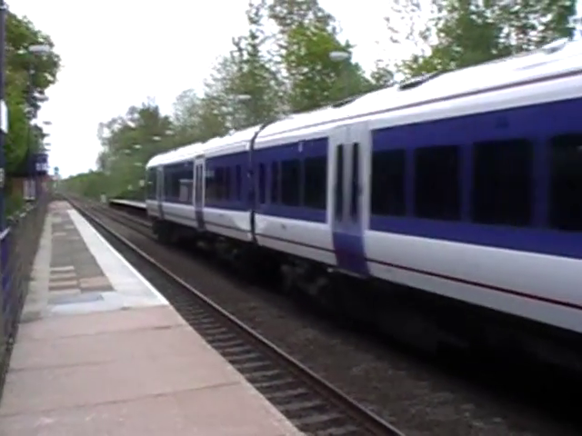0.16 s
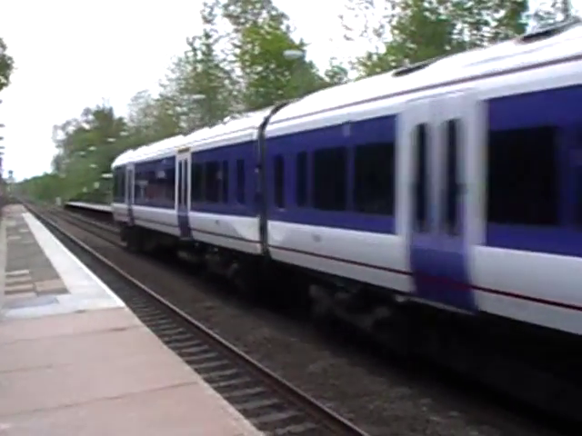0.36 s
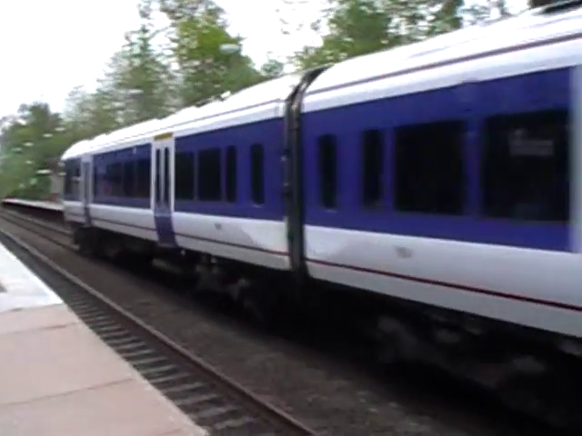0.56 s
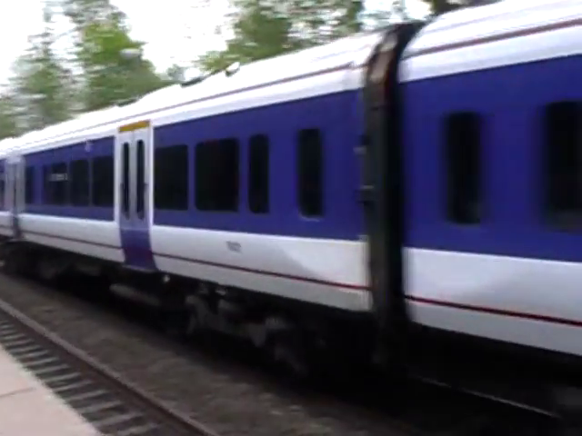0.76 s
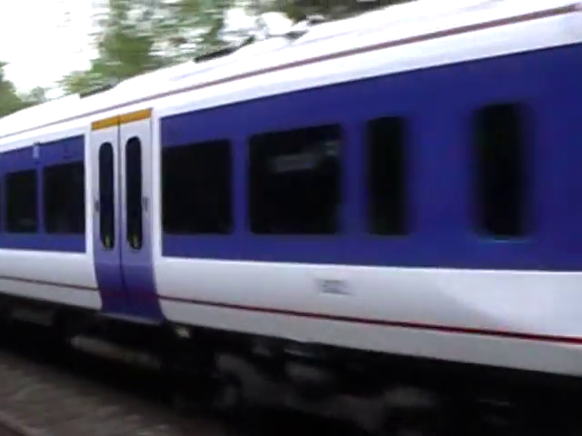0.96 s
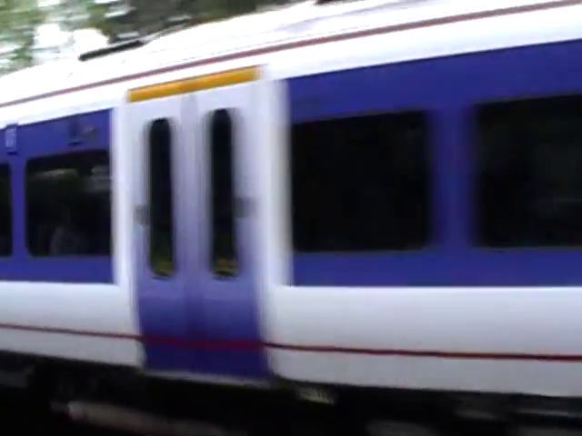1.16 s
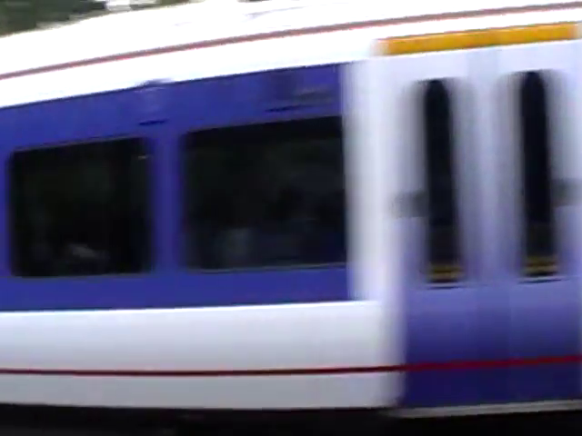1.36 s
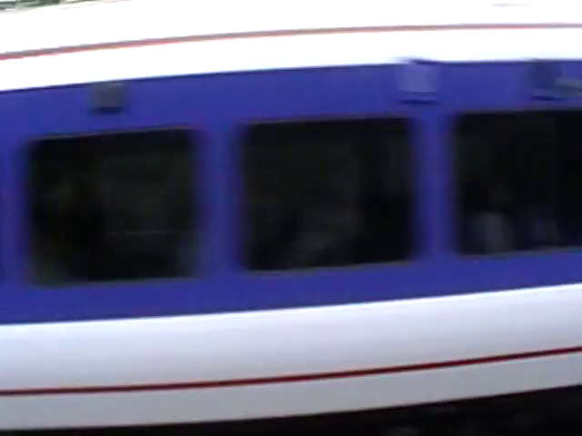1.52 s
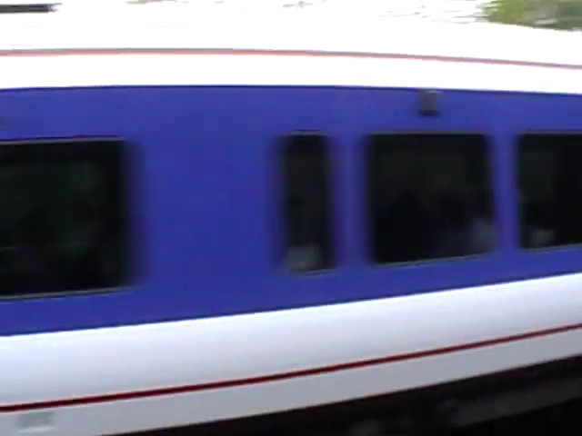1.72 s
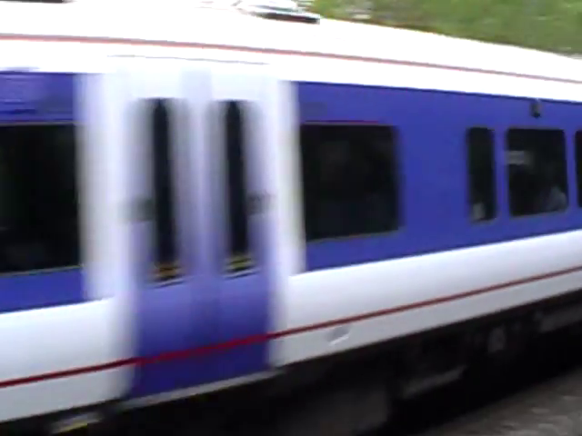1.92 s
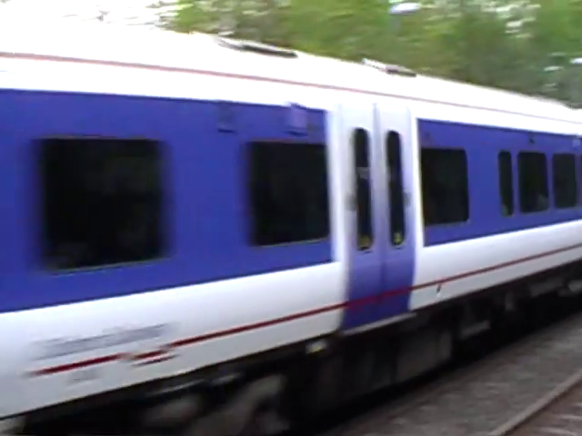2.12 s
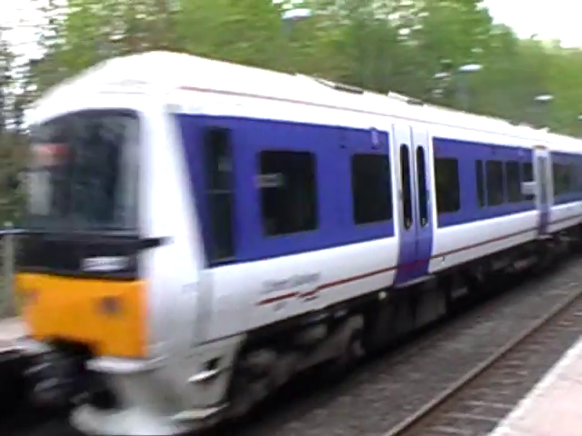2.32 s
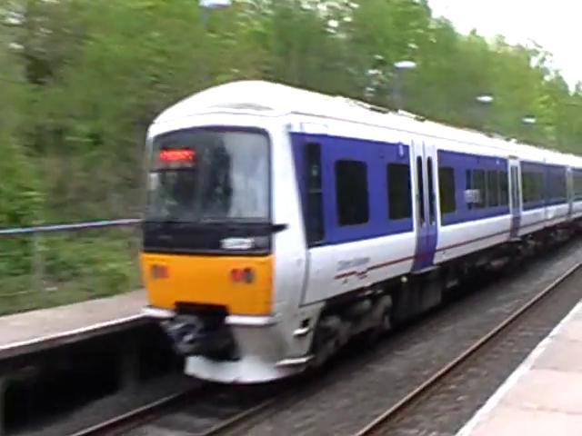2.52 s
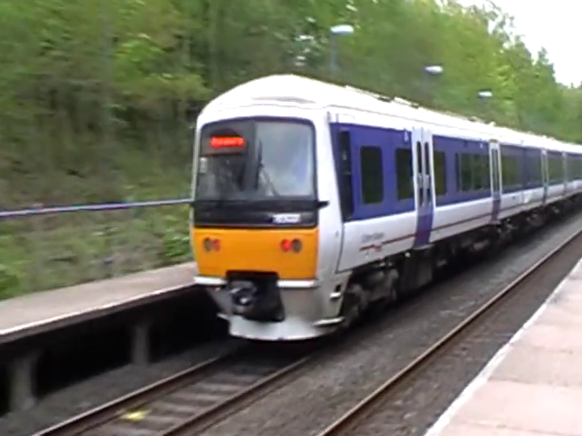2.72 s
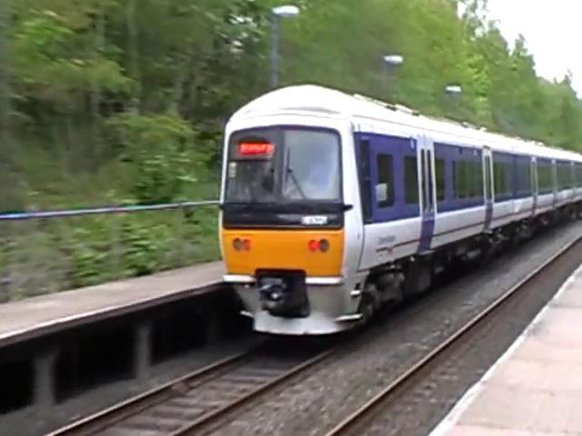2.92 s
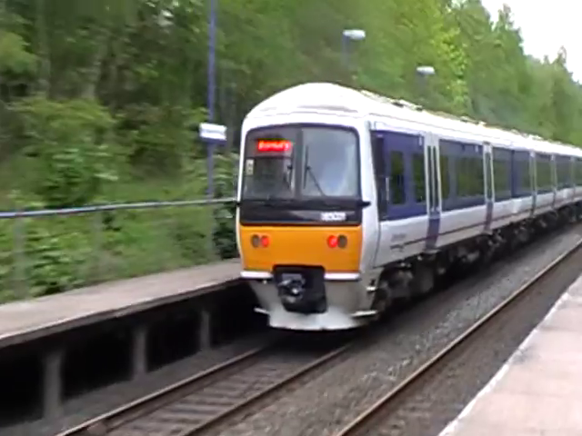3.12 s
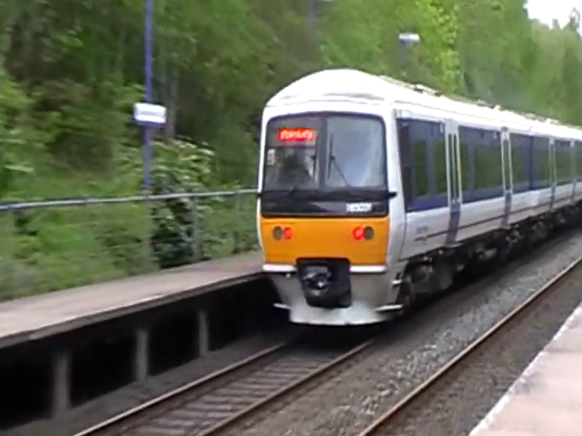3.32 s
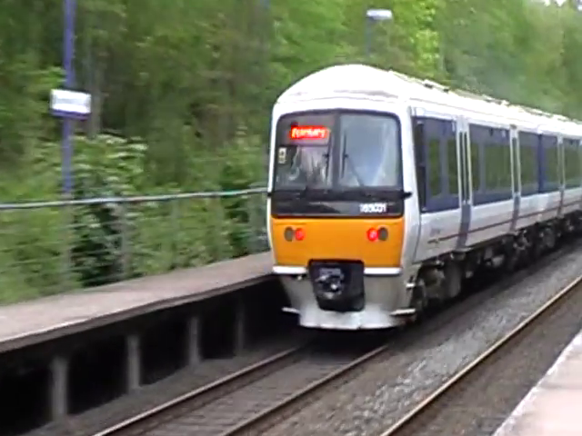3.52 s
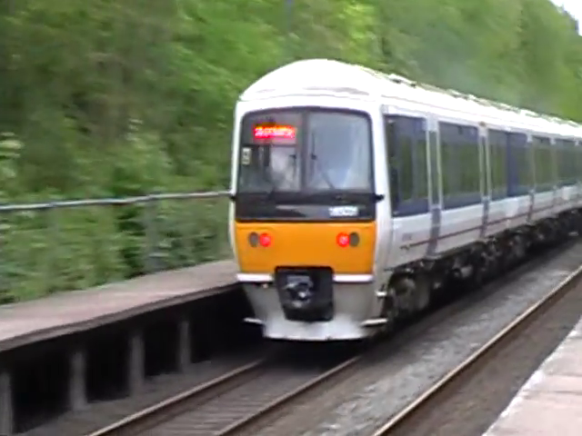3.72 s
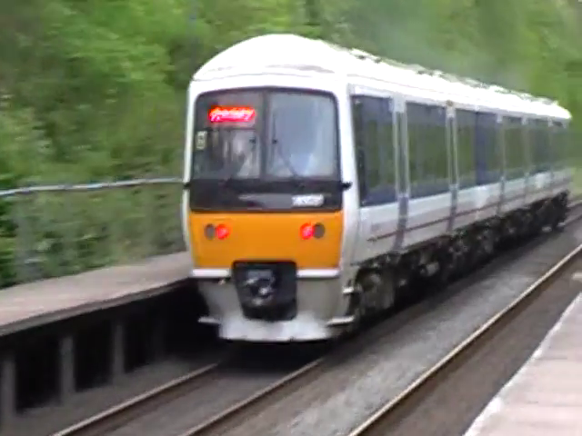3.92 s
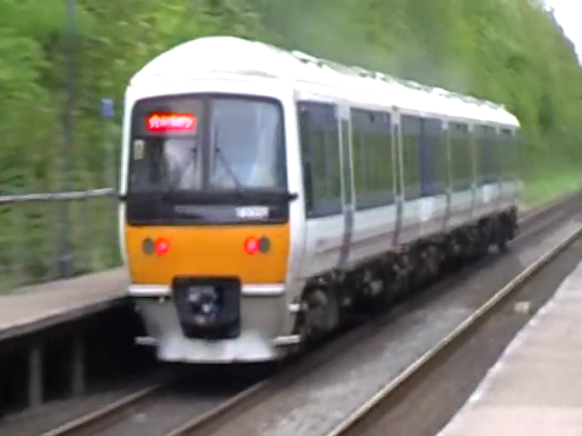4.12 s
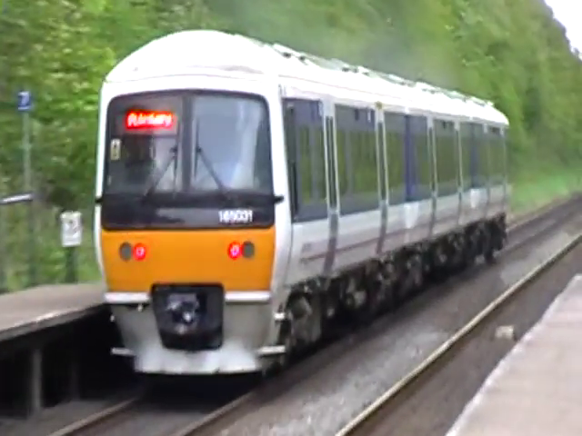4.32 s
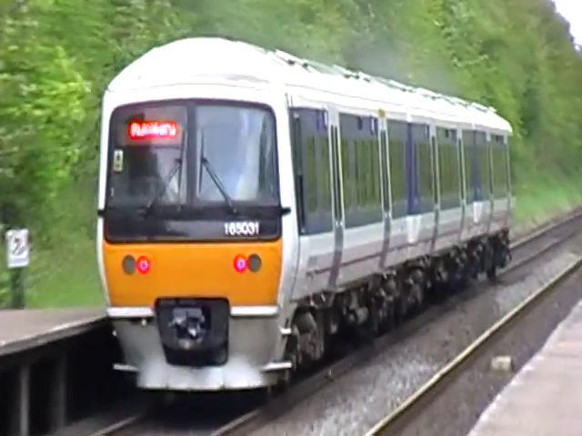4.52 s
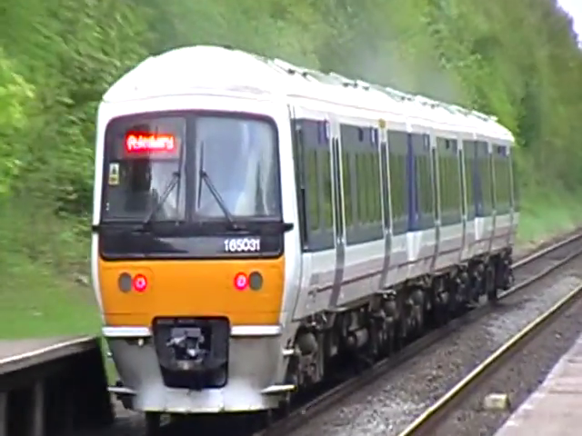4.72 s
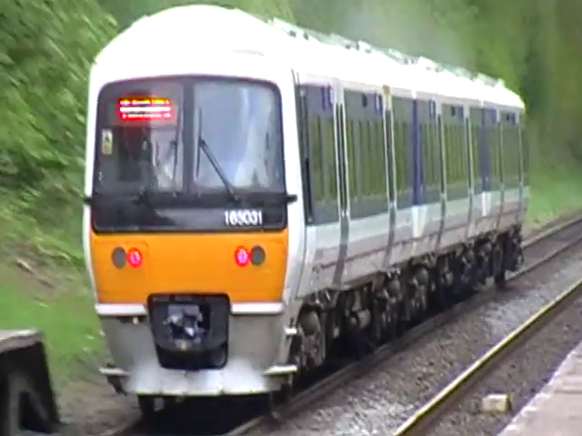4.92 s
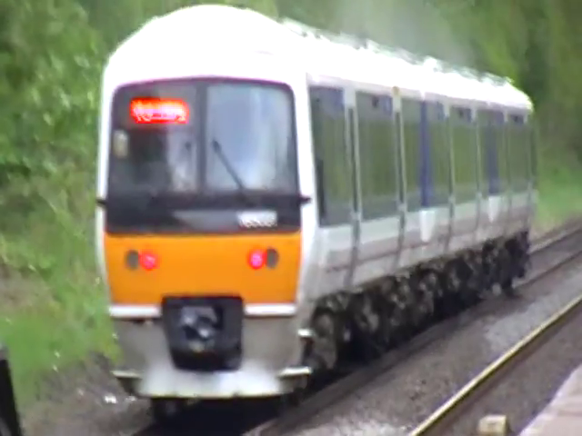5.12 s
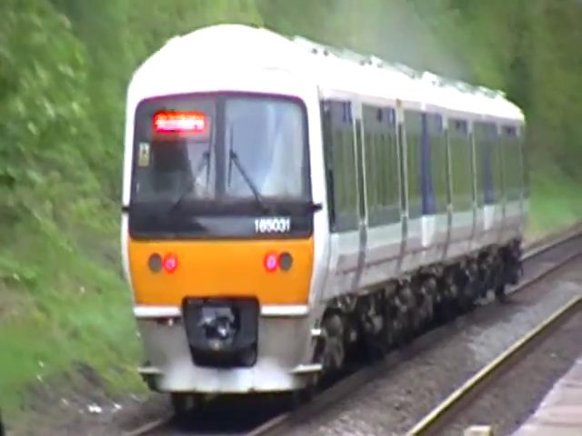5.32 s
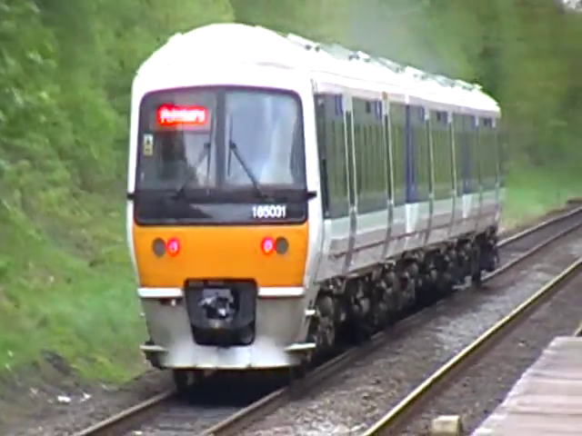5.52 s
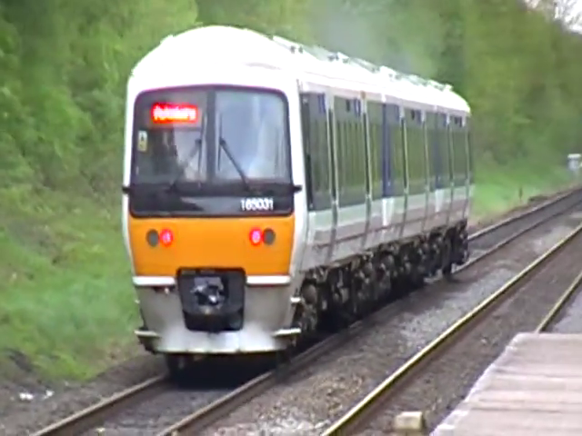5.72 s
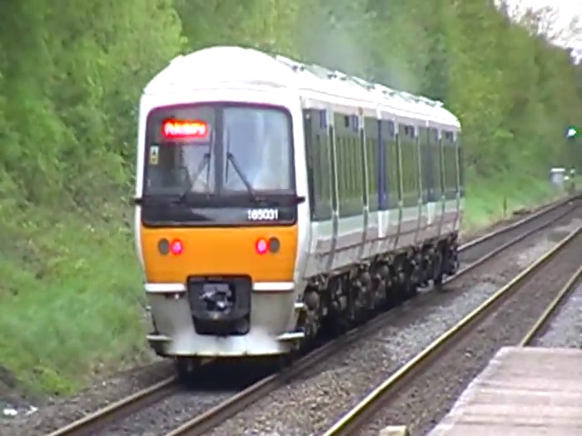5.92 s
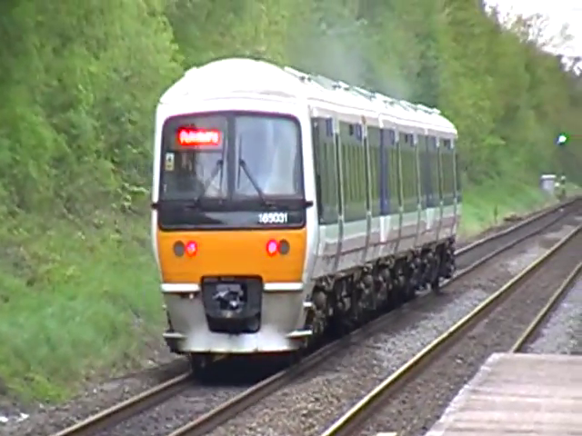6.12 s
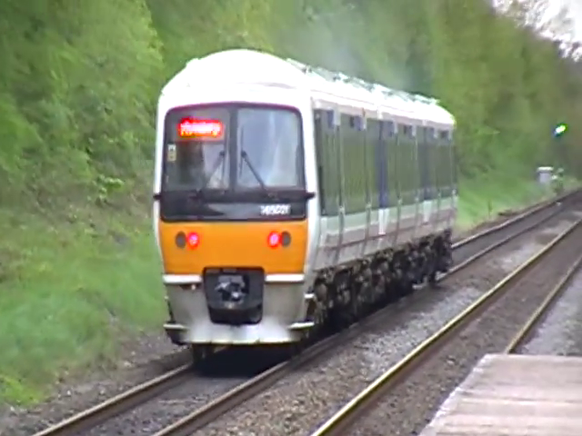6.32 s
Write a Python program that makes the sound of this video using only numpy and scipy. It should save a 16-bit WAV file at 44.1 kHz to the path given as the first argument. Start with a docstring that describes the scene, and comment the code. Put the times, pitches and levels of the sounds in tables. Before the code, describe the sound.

From 0 s a fast diesel train is already close beside the platform: dense low roar, gritty rail rush and bright wheel hiss, with a tight run of hollow clacks in the first 0.4 s. Around 0.4 to 1.2 s the engine passes, its drone sliding down in pitch. More knocks come at 0.8 to 1.5 s and about 1.8 to 2.1 s, while wheels hiss, ring and sing roughly and the bogies squeal. The tail goes by near 2.3 s. From 2.7 to 4 s a departing exhaust bellows in throaty surges, strongest near 3.2 and 3.5 s, with a beating drone and gear whine. After 3.6 s the rush weakens and loses treble. Small knocks patter on, with one strong clack near 5.1 s. From 5.5 s the remaining engine note sags and dies away by 6.3 s. Close, open-air, small camera microphones.

```python
"""Railcar past the platform

Close at the platform edge a diesel railcar sweeps past at speed, then draws away along the cutting.
Sine orders make its three engines, one falling in pitch as it passes; shaped noise makes rails, wheels, air.
Axles knock on uneven rail as short hollow bursts, each with one echo off the platform edge.
A small camera microphone pair colours the sound; its left port is shifted in phase and dulled on top."""
import sys
import numpy as np
from scipy import signal
from scipy.fft import rfft, irfft, next_fast_len
from scipy.io import wavfile

SR = 44100
rng = np.random.default_rng(int(sys.argv[2]) if len(sys.argv) > 2 else 0)


def to_wav(s):
    """Save 16-bit WAV."""
    ch = np.atleast_2d(s).T  # columns
    pcm = np.round(np.clip(ch, -1, 1) * 32767)  # PCM
    wavfile.write(sys.argv[1], SR, pcm.astype(np.int16))


N = 280476

# Engine slipping past the platform: peak_s, peak_db, rise_db_per_s, fall_db_per_s
PASSING = (.74, -33, 70, 2.5)
# Its orders: order (multiple of the cycle), level_db (relative)
PASSING_ORDERS = [(2, 1), (3, -11), (4, -13), (5, -5), (7, -7), (8, -3.5)]
PASSING_GONE_S, PASSING_DROP = 1.45, 30   # from here it drops out faster, by so many more dB/s
# cycle in Hz: middle and half span of its fall; middle and time scale of the fall, s
PASSING_HZ, PASSING_GLIDE_HZ, GLIDE_AT_S, GLIDE_S = 38.7, 7.2, .75, .4

# Exhaust pipe of the engine pulling away: order, level_db (relative)
PIPE = [(4, -23), (5, -14.5), (6, -3.5), (7, -7), (8, -1)]
LEAVING_HZ = 31.82   # its firing cycle
# swells of its second order and of its pipe orders: peak_s, peak_db, rise_db_per_s, fall_db_per_s
LEAVING, LEAVING_PIPE = (3.5, -40, 9, 5), (3, -32, 13, 5)
# Moments when that engine bellows: centre_s, lift_db
SURGES = [(2.78, 4), (2.99, 2), (3.15, 10), (3.52, 9), (3.97, 3)]
SURGE_S, SECOND_SURGES = .085, .4   # time scale of a surge, s; share of its lift in the second order

# Engine whose throttle eases at the end: peak_s, peak_db, rise_db_per_s, fall_db_per_s
EASING = (3.5, -36, 2, 3)
# Its orders: order, level_db (relative)
EASING_ORDERS = [(4, 2), (5, -4), (6, -11)]
EASING_HZ, EASING_CLIMB = 40.9, .55   # cycle at 0 s, Hz; its climb, Hz/s
EASE_AT_S, EASING_SAG = 5.45, 9   # the sag begins, s; its growth, Hz/s^2
EASING_GONE_S, EASING_DROP = 6.18, 70   # from here it dies away faster, by so many more dB/s

# Drone of two engines nearly in tune: peak_s, peak_db, rise_db_per_s, fall_db_per_s
DRONE = (3.4, -28.5, 5.5, 7)
DRONE_HZ, BEATS_PER_S, BEAT_AT_S, BEAT_DEPTH = 281, 4.6, 3.32, .7   # cycle, Hz (the tone sounds at 0.98 of it, near 275 Hz); beats per s, one loud moment, depth
# Whine of the final drives: peak_s, peak_db, rise_db_per_s, fall_db_per_s
WHINE = (3.5, -31.5, -0.5, 3.5)
WHINE_HZ, WHINE_SAG = 254.7, 2.2   # base pitch at 0 s, Hz; its fall, Hz/s
# Its orders: order, level_db (relative)
WHINE_ORDERS = [(2, -9.5), (3, -1.5), (4, -6), (6, -9.5)]

# Single tones, in row order: approaching drone and its return; deep hum; low thud; one rough singing note
# near 750 Hz in two overlapping swells, a higher and a lower note; early whine; wheels ringing close, and
# lower; a wide band of hiss near 3.3 kHz at the start; a soft low-middle rumble near 400 Hz at the start;
# squeal of an arriving bogie; rumble of the tail and under the passing engine; low wake of the train
# Columns: pitch_hz (at the peak), glide_hz_per_s, blur_hz (0 is clear),
# peak_s, peak_db (before blurring), rise_db_per_s, fall_db_per_s
TONES = [(181, -6, 0, 0, -25, 50, 28), (180, -12, 0, .42, -26, 55, 70), (52, -.2, 0, 3.2, -48, 7, 3),
         (75, -40, 0, 4.28, -37, 230, 230), (755, -15, 20, 1.52, -33, 40, 14),
         (745, -10, 20, 2.3, -30, 10, 22), (1000, 0, 15, 2.45, -33, 30, 25),
         (630, 0, 15, 1.25, -31, 130, 80), (1385, -55, 25, .9, -35, 6, 14),
         (2820, -30, 200, 1.7, -26, 10, 24), (2150, -100, 300, 1.45, -29, 40, 14),
         (3350, -100, 260, .4, -30, 70, 16), (400, 0, 60, .3, -34, 8, 14),
         (3850, 300, 90, 1.42, -31, 60, 25), (110, -10, 35, 2.55, -33, 10, 14),
         (110, -20, 35, 1.05, -37, 20, 14), (68, -1.2, 16, 2.5, -47, 16, -.4)]
TONE_CORE = 1.1   # steady part of a tone blurred by less than 30 Hz

# Axles knocking on uneven rail: start_s, peak_db (before grit), pitch_hz (middle), length_s
KNOCKS = [(.013, -15, 680, 0.009), (0.1, -15, 845, 0.012), (0.111, -12, 860, 0.009),
          (0.214, -16, 600, 0.012), (0.229, -13.5, 780, 0.007), (0.389, -15, 690, 0.0095),
          (0.834, -15.5, 870, 0.017), (0.896, -17, 760, 0.012), (0.949, -13.5, 900, 0.012),
          (1.274, -18, 654, 0.016), (1.346, -18, 640, 0.014), (1.458, -18, 750, 0.014),
          (1.51, -18, 742, 0.02), (1.823, -17, 747, 0.01), (1.94, -16, 710, 0.011), (2.07, -16, 710, 0.013),
          (2.652, -16.5, 985, 0.023), (2.915, -21, 724, 0.016), (3.27, -20, 830, 0.013),
          (3.875, -17, 780, .01), (4.058, -21, 950, .012), (4.188, -21, 900, 0.014),
          (4.361, -20, 693, 0.012), (4.443, -20, 750, 0.013), (4.572, -21, 734, 0.011),
          (4.692, -21.5, 750, 0.013), (4.791, -18, 712, 0.015), (4.967, -18.5, 825, 0.011),
          (5.081, -13.5, 850, 0.018), (5.528, -25, 800, .01)]
KNOCK_FALL, KNOCK_GRIT = 0.2, .22   # share of pitch lost during a knock; share of gritty noise
KNOCK_ECHO_S, KNOCK_ECHO_DB = .017, -7.5
# small knocks per s over the whole length; least peak over the rail noise, dB; length, s
CLATTER_PER_S, CLATTER_DB, CLATTER_S = 14, -7, 0.0097

# Spectra of the noises, silent outside their ends: pitch_hz, density_db (relative, per Hz)
ROAR = [(25, -34), (45, -35), (70, -25), (100, -8), (140, -9), (180, -2.5), (260, -2.5), (330, -7),
        (420, -17), (700, -17.5)]
RAIL = [(250, -23), (380, -14), (500, -9.5), (900, -12.5), (1100, -11.5), (1200, -13.5), (1800, -24.5)]
WHEELS = [(800, -4), (1200, -15.5), (1490, 2.5), (1700, -1.5), (2000, 1.5), (2500, 0.5), (2900, 0.5),
          (3150, -10), (3500, -50)]
GEARS = [(2800, -8.5), (3200, -8), (3600, 0.5), (4050, 2), (4500, -4), (5200, -12), (6500, -18.5),
         (8500, -34.5)]
AIR = [(4500, -3), (6000, -7), (8000, -2), (10000, 1.5), (11500, -3.5), (13000, -9), (14500, -20),
       (16000, -24)]
BROAD = [(60, -28), (90, 0.5), (130, 6), (350, 0.5), (600, 1), (1400, 0.5), (2200, -34), (3200, -5),
         (5000, -12.5), (7000, -15), (9000, -26)]
# Resonances of the rail: pitch_hz, width_hz, level_db (relative, before a threefold power gain)
RAIL_MODES = [(461, 62, -3.5), (635, 27, 1.5), (720, 99, -2), (840, 81, -1), (1011, 65, 0.5)]
# Nearness of the bogies to the platform: time_s, lift_db (scaled for each noise)
BOGIES = [(0, -0.5), (.15, 2.5), (.26, 1), (.34, 4), (.55, 4.5), (.78, 4), (.98, -0.1), (1.15, 2.5),
          (1.35, 3), (1.43, 5), (1.8, 6.5), (1.92, 4.5), (2.1, 4), (2.3, 4), (2.6, 3), (2.78, 4),
          (2.88, 3.5), (3.0, 3.5), (3.3, 3.5), (3.45, 1.5), (3.62, 1.7), (3.8, 1)]
# Levels of the noises: level_db (base), bogie_share (of the lift),
# drift_db_per_s (until the fading), loss_share (of the distance loss)
ROAR_LEVEL = (-26, -0.33, -0.77, 1.65)
RAIL_LEVEL = (-23, -0.46, 0.04, 1.24)
WHEEL_LEVEL = (-27.5, 0.63, 0.19, 1.28)
GEAR_LEVEL = (-29.5, 0.93, 1.01, 1.61)
AIR_LEVEL = (-38.5, 1.48, -0.6, 2)
# Broad noise spread by the coach sides: peak_s, peak_db, rise_db_per_s, fall_db_per_s
COACH_SIDES = (0.96, -24, 7.5, 6)
SIDES_LOSS = 2.8   # its share of the distance loss

FADE_FROM_S, DOUBLING_S = 3.58, 1.92   # the fading starts; time for the distance to double
DULL_HZ, DULL_SHARE = 11400, 1.4   # the top dulls above this; share of the distance loss
SCREEN_HZ, SCREEN_DB, SCREEN_S = 4600, -4, .3   # treble of the noises starts screened, fully open at this time
# Microphone pair: pitch_hz, common_share (of noise at both ports), left_db, left_lag_rad
PORTS = [(40, 1, -2.5, 0.3), (323, 0.99, -1, 0.05), (765, .991, -2.5, -0.35), (1200, 1, -5, 0.22),
         (1810, 0.97, -3.5, 0), (2790, 1, -0.5, 0.2), (4140, 0.99, 0.06, .5), (5550, 0.91, 3, 1.0),
         (7550, 0.91, 3, 2), (8250, .96, 2, 2.5), (9400, .93, -1.5, 3.5), (11250, 0.49, -10, 4.5),
         (12300, .3, -17, -5), (13500, .1, -45, 4.0)]
CUTOFF_HZ = 15020   # top of the microphone pair


def passing_engine():
    """Exhaust orders that fall in pitch together as the engine goes by."""
    t = seconds()
    level_db = swell(*PASSING) - PASSING_DROP * np.maximum(t - PASSING_GONE_S, 0)
    cycle_hz = PASSING_HZ - PASSING_GLIDE_HZ * np.tanh((t - GLIDE_AT_S) / GLIDE_S)
    return from_db(level_db) * orders(cycle_hz, PASSING_ORDERS)


def leaving_engine():
    """Exhaust of the engine pulling away: a second order and pipe orders, lifted as it bellows."""
    surge_db = sum(lift_db * np.exp(-((seconds() - s) / SURGE_S) ** 2) for s, lift_db in SURGES)
    second_db = swell(*LEAVING) + SECOND_SURGES * surge_db
    pipe_db = swell(*LEAVING_PIPE) + surge_db
    levels = [(2, second_db)] + [(order, pipe_db + db) for order, db in PIPE]
    return orders(LEAVING_HZ, levels, rough_db=1.6)


def easing_engine():
    """Exhaust orders that climb slowly, then sag and die away as the throttle eases."""
    t = seconds()
    cycle_hz = EASING_HZ + EASING_CLIMB * t - EASING_SAG * np.maximum(t - EASE_AT_S, 0) ** 2
    level_db = swell(*EASING) - EASING_DROP * np.maximum(t - EASING_GONE_S, 0)
    return from_db(level_db) * orders(cycle_hz, EASING_ORDERS)


def beating_drone():
    """Two engines nearly in tune, heard as one tone beating in strength."""
    beat = 1 + BEAT_DEPTH * np.cos(2 * np.pi * BEATS_PER_S * (seconds() - BEAT_AT_S))
    tone = orders(DRONE_HZ, [(0.98, 0)])
    return from_db(swell(*DRONE)) * beat / (1 + BEAT_DEPTH) * tone


def drive_whine():
    """Final drives as harmonics falling in pitch, roughened by fast chance in their strength."""
    cycle_hz = WHINE_HZ - WHINE_SAG * seconds()
    return from_db(swell(*WHINE)) * orders(cycle_hz, WHINE_ORDERS, blur_hz=30, steady=.3)


def single_tones():
    """Hums, singing notes, wheel rings and rumbles: gliding sines, some blurred into narrow noise."""
    out = np.zeros(N)
    for hz, glide, blur_hz, *shape in TONES:
        pitch_hz = hz + glide * (seconds() - shape[0])
        steady = TONE_CORE * (blur_hz < 30)
        out += from_db(swell(*shape)) * orders(pitch_hz, [(1, 0)], blur_hz=blur_hz, steady=steady)
    return out


def knocks():
    """Each knock is a short hollow burst that sags in pitch, gritty, with one echo off the platform edge."""
    out = np.zeros(N + SR)
    grit_band = signal.butter(2, [560, 1100], "band", fs=SR, output="sos")
    grit = rms_one(signal.sosfilt(grit_band, rng.standard_normal(N)))
    for s, peak_db, hz, length in KNOCKS + clatter():
        u = np.arange(round(length * SR)) / (length * SR)   # progress through the knock, 0 to 1
        turn = 2 * np.pi * np.cumsum(hz * (1 + KNOCK_FALL * (.5 - u))) / SR
        shape = np.sin(np.pi * u ** 0.53) ** 0.84
        gritty = np.sin(turn) + KNOCK_GRIT * grit[round(s * SR):][:len(u)]
        burst = from_db(peak_db) * shape * gritty
        for lag, db in ((0, 0), (KNOCK_ECHO_S, KNOCK_ECHO_DB)):
            at = round((s + lag) * SR)
            out[at:at + len(u)] += from_db(db) * burst
    return out[:N]


def clatter():
    """Small knocks at chance moments, their level following the rail noise."""
    rail_db = train_level(*RAIL_LEVEL)
    # chance start in s, extra level up to 6 dB, place in the pitch range
    small = rng.random((int(CLATTER_PER_S * N / SR), 3)) * [N / SR - .05, 6, 1]
    return [(s, rail_db[int(s * SR)] + CLATTER_DB + db, 600 + 400 * tone, CLATTER_S)
            for s, db, tone in small]


def low_roar(sweep):
    """Low roar of the train as shaped noise."""
    return rush(ROAR, train_level(*ROAR_LEVEL), sweep, patchy_db=1.5, flicker_db=-1.2)


def rail_rush(sweep):
    """Rail noise with resonances standing out of its broad spectrum."""
    return rush(RAIL, train_level(*RAIL_LEVEL), sweep, patchy_db=0.98, flicker_db=-0.04, modes=RAIL_MODES)


def wheel_rush(sweep):
    """Wheel noise in the middle range, louder as the bogies come near."""
    return rush(WHEELS, train_level(*WHEEL_LEVEL), sweep, patchy_db=0.5, flicker_db=0.6)


def gear_rush(sweep):
    """Gear noise above the wheels, louder as the bogies come near."""
    return rush(GEARS, train_level(*GEAR_LEVEL), sweep, patchy_db=0.3, flicker_db=0.8)


def air_hiss(sweep):
    """High air hiss, flickering and fading quickly with distance."""
    return rush(AIR, train_level(*AIR_LEVEL), sweep, patchy_db=0.6, flicker_db=2.1)


def coach_sides(sweep):
    """Broad noise spread by the coach sides, in one swell."""
    level_db = swell(*COACH_SIDES) - SIDES_LOSS * distance_loss()
    return rush(BROAD, level_db, sweep, patchy_db=0.7, flicker_db=0.9)


def dull_top(noise):
    """The top of the noise dulls as the train draws away."""
    top = signal.sosfiltfilt(signal.butter(2, DULL_HZ, "high", fs=SR, output="sos"), noise)
    return noise - top * (1 - from_db(-DULL_SHARE * distance_loss()))


def screen_start(noise):
    """The treble starts screened, then opens."""
    treble = signal.sosfiltfilt(signal.butter(2, SCREEN_HZ, "high", fs=SR, output="sos"), noise[:, :SR])
    closed = np.clip(2 - 2 * seconds()[:SR] / SCREEN_S, 0, 1)   # opens in the second half of SCREEN_S
    noise[:, :SR] -= treble * (1 - from_db(SCREEN_DB * closed))
    return noise


def orders(cycle_hz, levels, wobble=0.001915, rough_db=0.0, blur_hz=0, steady=0):
    """Sines on multiples of a cycle, uneven below 30 Hz of blur; strength may waver or blur by chance."""
    uneven = 1 + (wobble * drift(2.76) if blur_hz < 30 else 0)
    turn = 2 * np.pi * np.cumsum(cycle_hz * uneven * np.ones(N)) / SR
    out = 0
    for order, db in levels:
        swing = 1
        if blur_hz:
            swing = steady + drift(blur_hz)
        elif rough_db:
            swing = from_db(rough_db * drift(3.6))
        out = out + from_db(db) * swing * np.sin(order * turn + rng.uniform(0, 2 * np.pi))
    return np.sqrt(2) * out   # a plain sine at 0 dB has unit rms


def rush(spectrum, level_db, shared, patchy_db, flicker_db, modes=()):
    """Noise in overlapping bands that swell together and flicker alone; the ports share only part of it."""
    hz, size = bins_hz(), next_fast_len(N)
    low_hz, high_hz = spectrum[0][0], spectrum[-1][0]
    colour = from_db(at_hz(spectrum)) * (hz > low_hz) * (hz < high_hz)
    if modes:   # resonances add in power on top of the broad shape
        peaks = sum(from_db(2 * db) / (1 + (2 * (hz - f) / w) ** 2) * 3 for f, w, db in modes)
        colour = colour * np.sqrt(1 + peaks)
    common, own = rfft(rng.standard_normal((2, size))) * colour
    alike = np.clip(at_hz(PORTS), 0, 1)
    pair = np.array([alike * common + np.sqrt(1 - alike ** 2) * own, common])   # left, right
    place = np.log(hz / low_hz) / np.log(high_hz / low_hz) * 3   # 0 to 3 across the spectrum
    near = np.clip(1 + (level_db - level_db.max()) / 24, .3, 1)   # far sound is smoother
    out = 0
    for k in range(4):
        band = irfft(pair * np.clip(1 - abs(place - k), 0, 1), size)[:, :N]
        out = out + band * from_db(near * (patchy_db * shared + flicker_db * drift(13.0)))
    return from_db(level_db) * rms_one(out)


def train_level(level_db, bogie_share, drift_db, loss_share):
    """Level in dB of one noise of the train, from bogie nearness, drift and distance."""
    bogie_s, lift_db = np.transpose(BOGIES)
    nearness_db = bogie_share * np.interp(seconds(), bogie_s, lift_db)
    drifted_db = drift_db * np.minimum(seconds(), FADE_FROM_S)
    return level_db + nearness_db + drifted_db - loss_share * distance_loss()


def distance_loss():
    """Spreading loss in dB as the train draws away."""
    return 20 * np.log10(1 + np.maximum(seconds() - FADE_FROM_S, 0) / DOUBLING_S)


def swell(peak_s, peak_db, rise, fall):
    """Level in dB built from steady rates in dB/s before and after a peak time."""
    return peak_db - np.maximum(rise * (peak_s - seconds()), fall * (seconds() - peak_s))


def drift(rate_hz):
    """Chance with unit rms, smoothed by two equal low-pass stages at a rate."""
    r = np.exp(-80 * np.pi * rate_hz / SR)   # one step every 40 samples
    steps = rng.standard_normal(N // 40 + 2002)
    slow = signal.lfilter([1], [1, -2 * r, r * r], steps)[2000:]
    return np.interp(np.arange(N) / 40, np.arange(len(slow)), rms_one(slow))


def seconds():
    """Time of every sample."""
    return np.arange(N) / SR


def from_db(db):
    """Decibels to gain."""
    return 10 ** (np.asarray(db) / 20)


def rms_one(x):
    """Scale to unit rms."""
    return x / np.sqrt(np.mean(x ** 2) + 1e-20)


def bins_hz():
    """Frequencies of the padded transform, at least 1 Hz."""
    return np.maximum(np.fft.rfftfreq(next_fast_len(N), 1 / SR), 1)


def at_hz(points, index=1):
    """A column of a frequency table on the transform bins, along log frequency."""
    points = np.array(points)
    return np.interp(np.log(bins_hz()), np.log(points[:, 0]), points[:, index])


def scene():
    """All sources; one shared chance flutter makes the noises throb together."""
    engines = leaving_engine() + passing_engine() + easing_engine()
    tonal = engines + beating_drone() + drive_whine() + single_tones()
    axles = knocks()
    flutter = drift(27)
    noise = low_roar(flutter) + rail_rush(flutter) + wheel_rush(flutter)
    noise += gear_rush(flutter) + air_hiss(flutter) + coach_sides(flutter)
    return screen_start(dull_top(noise)) + tonal + axles


def record(dry):
    """The housing colours the left port and shifts its phase; both ports lose the top."""
    size = next_fast_len(N)
    port = from_db(at_hz(PORTS, index=2)) * np.exp(-1j * at_hz(PORTS, index=3))
    left = irfft(rfft(dry[0], size) * port, size)[:N]
    low_pass = signal.ellip(14, .5, 80, CUTOFF_HZ, fs=SR, output="sos")
    return signal.sosfilt(low_pass, [left, dry[1]])


dry = scene()
out = record(dry)
to_wav(out)
```